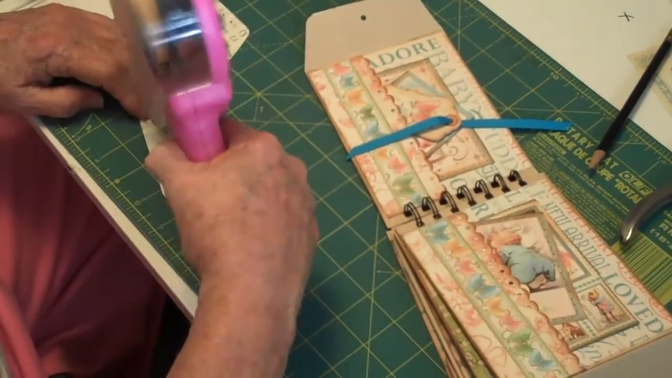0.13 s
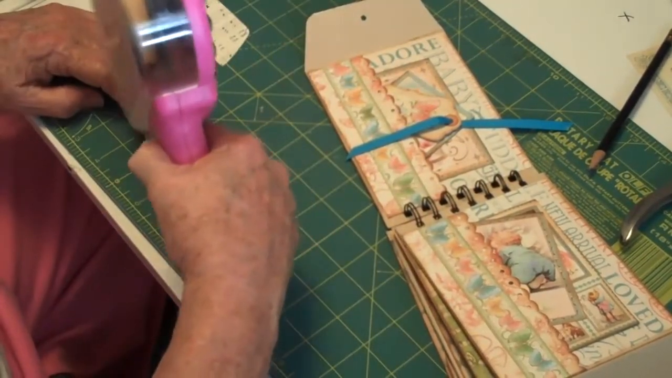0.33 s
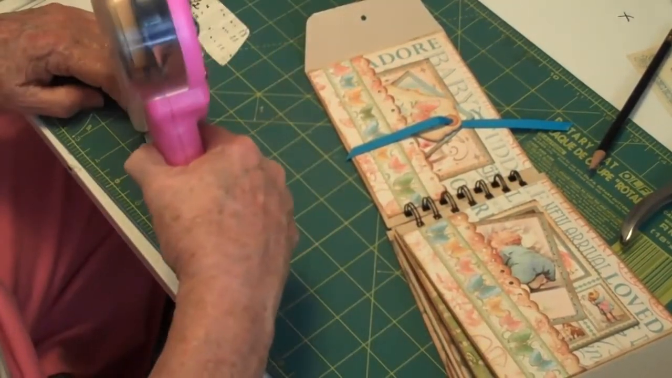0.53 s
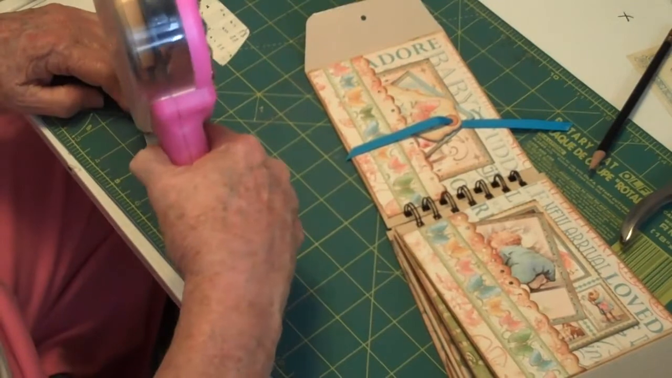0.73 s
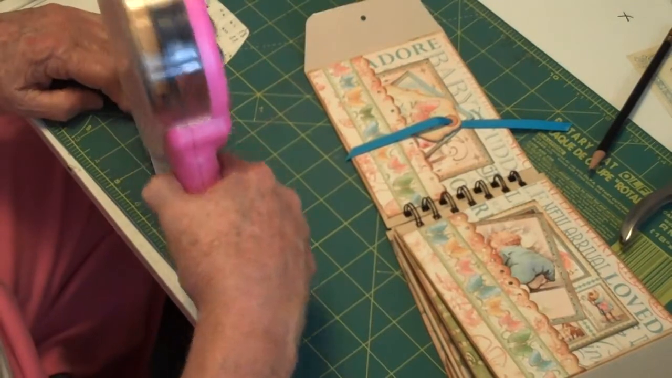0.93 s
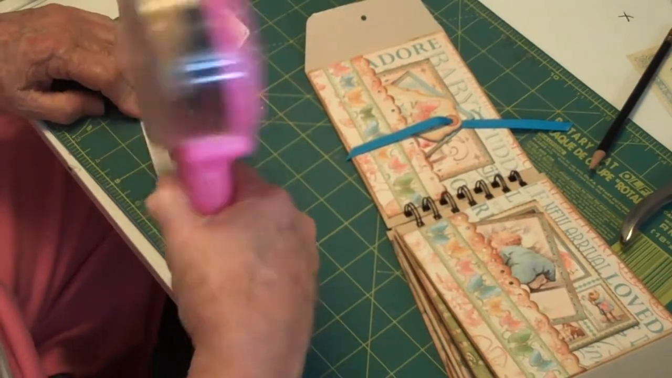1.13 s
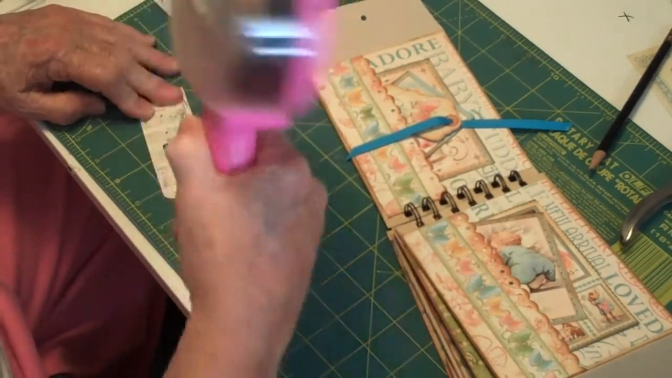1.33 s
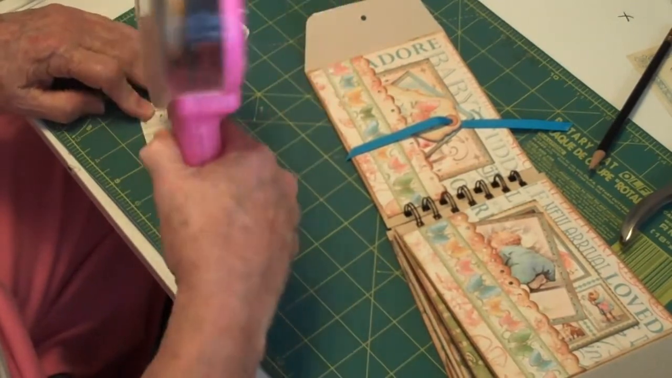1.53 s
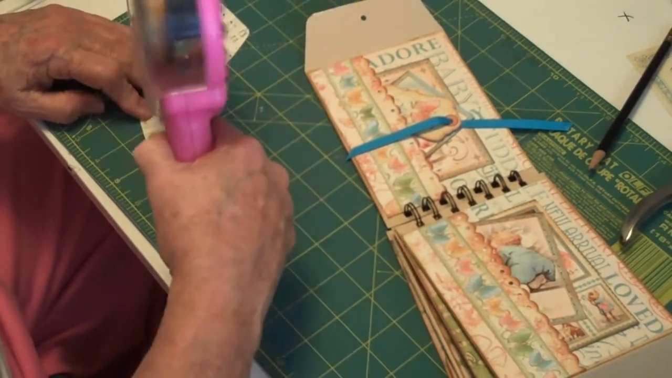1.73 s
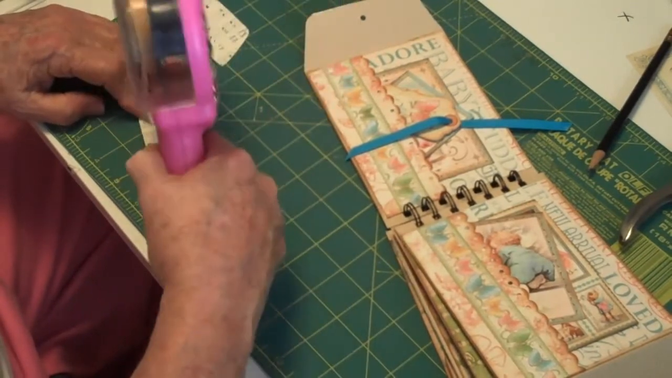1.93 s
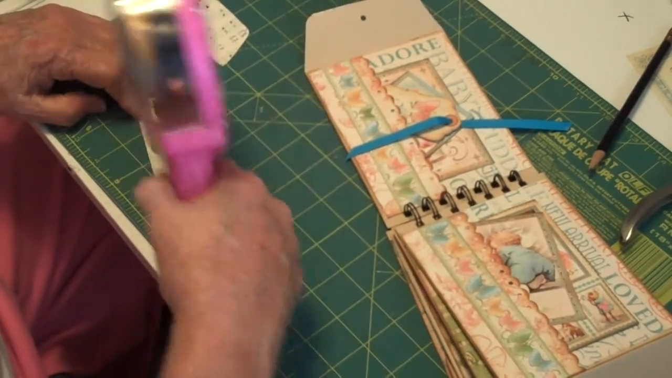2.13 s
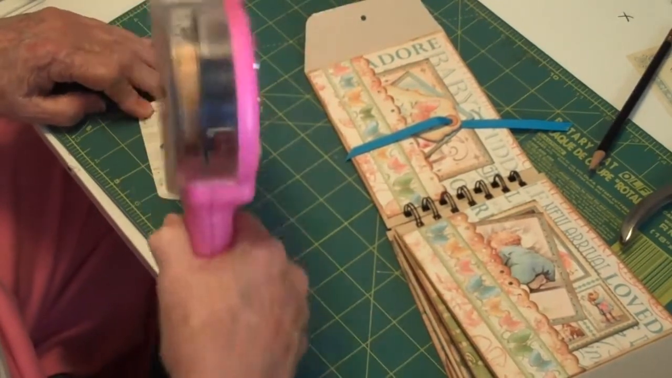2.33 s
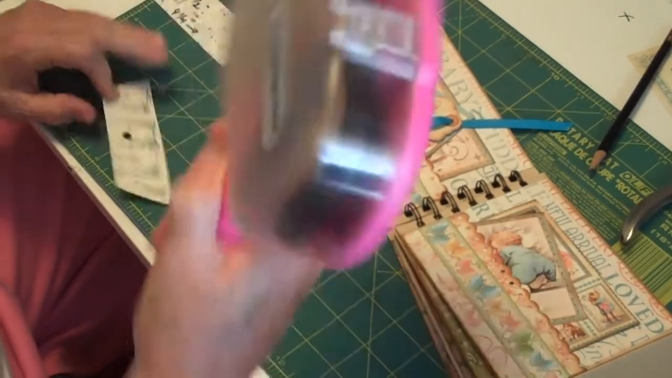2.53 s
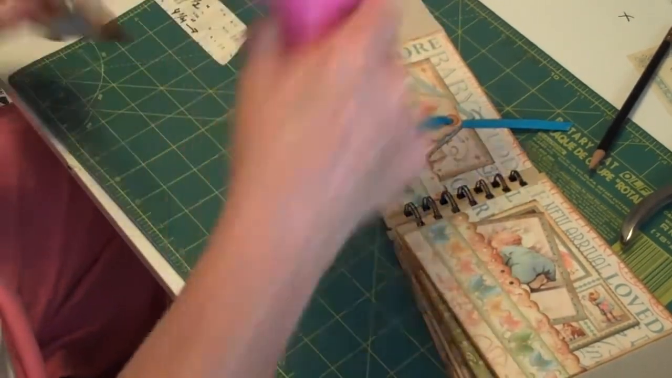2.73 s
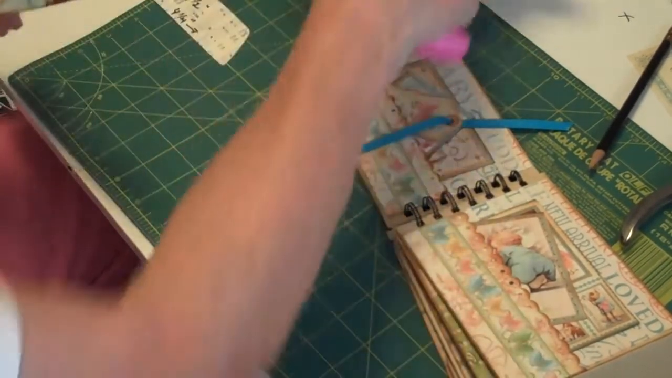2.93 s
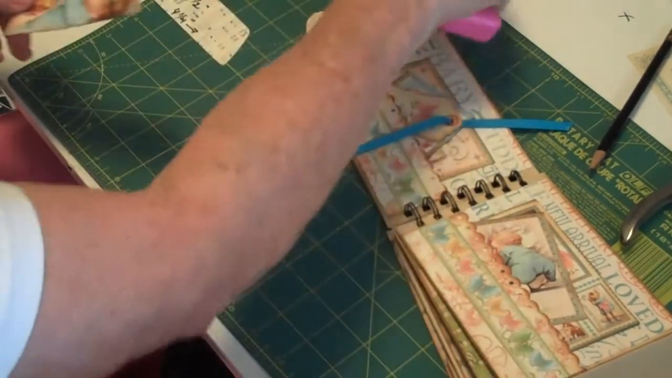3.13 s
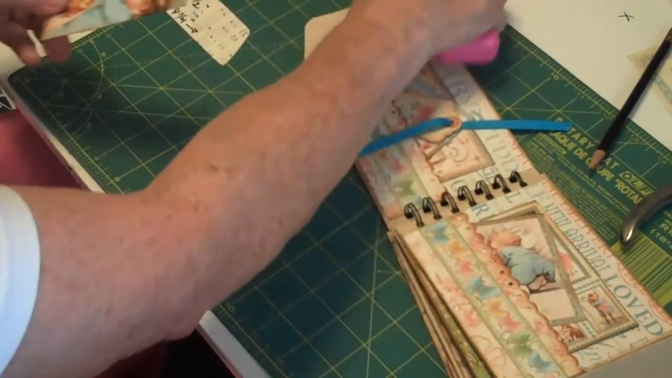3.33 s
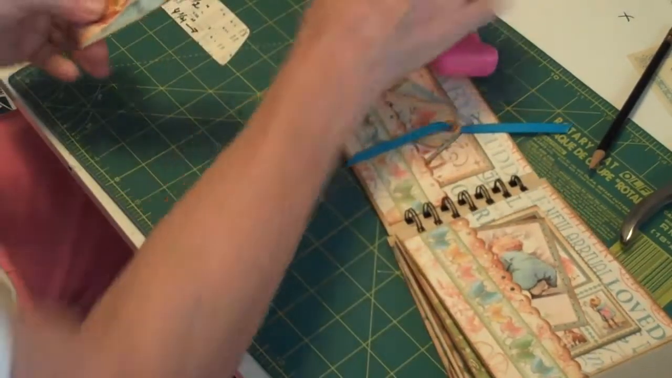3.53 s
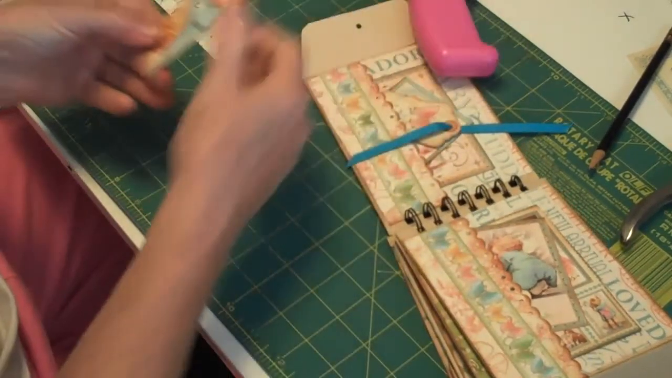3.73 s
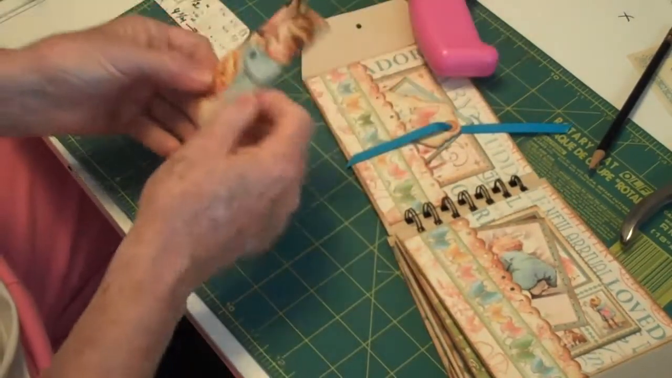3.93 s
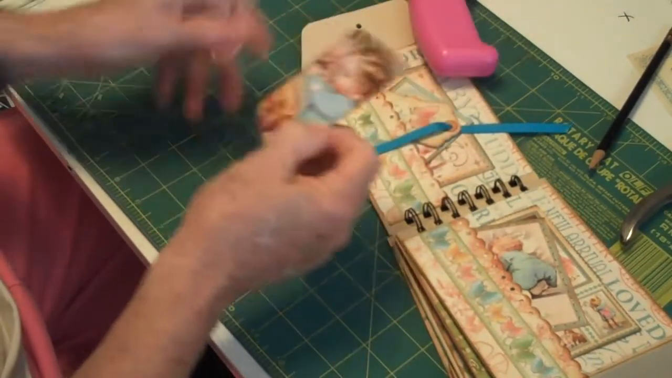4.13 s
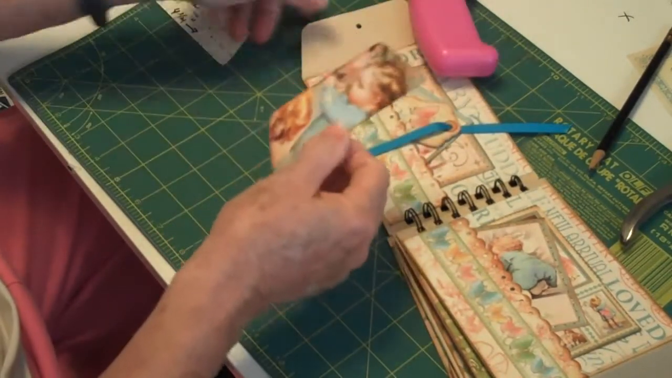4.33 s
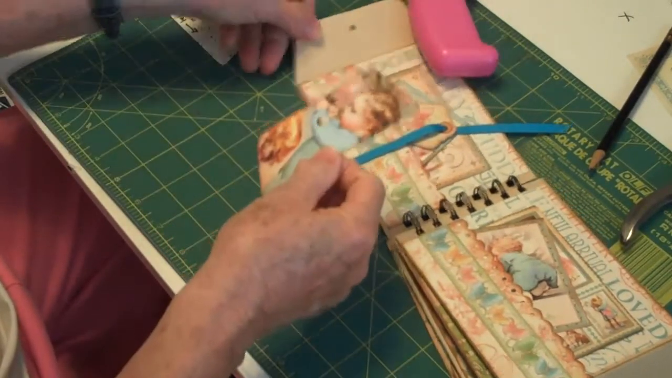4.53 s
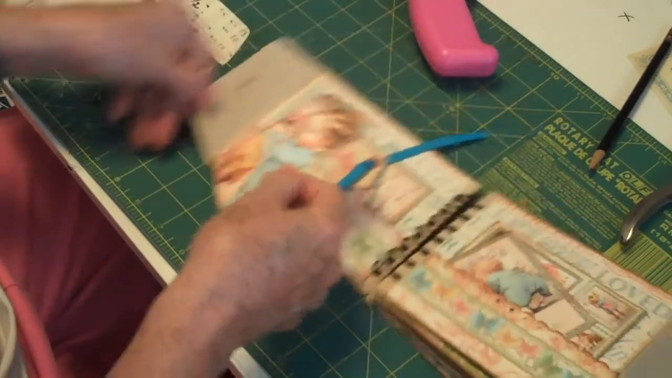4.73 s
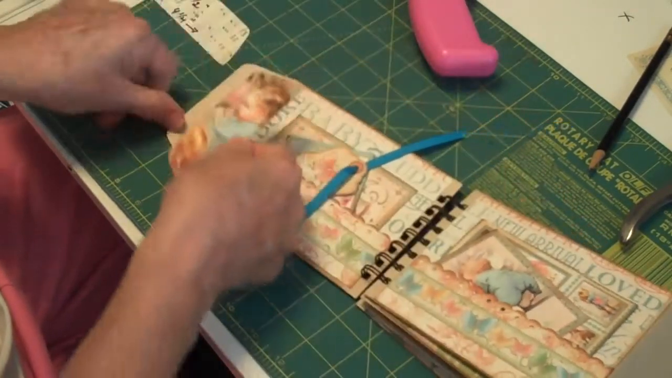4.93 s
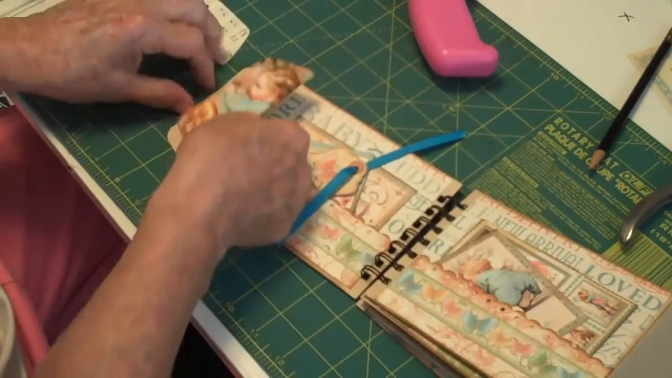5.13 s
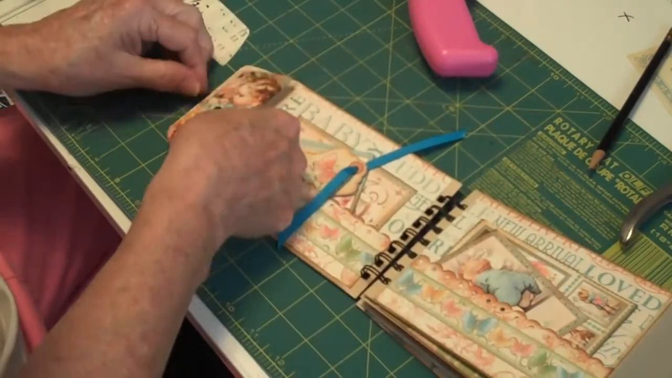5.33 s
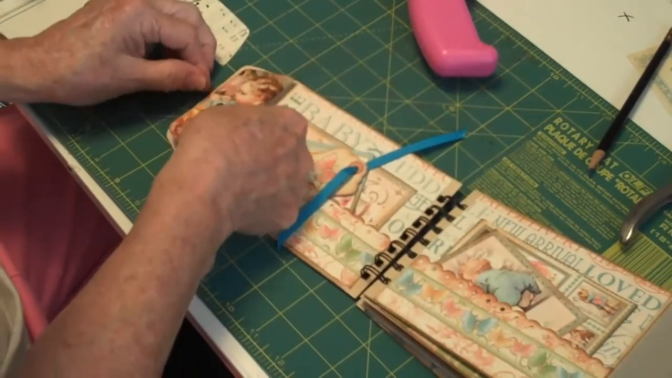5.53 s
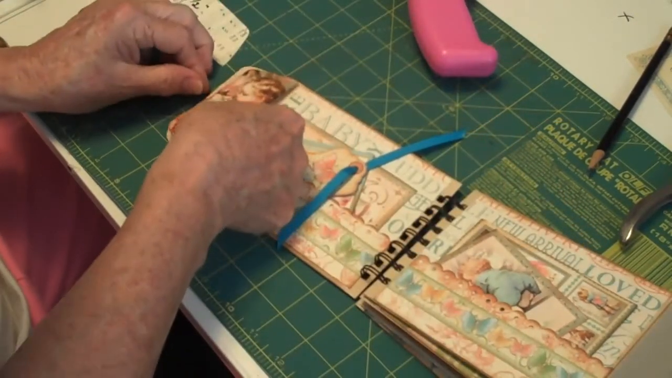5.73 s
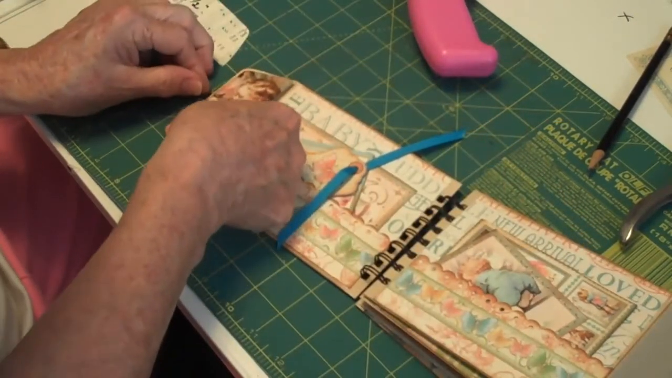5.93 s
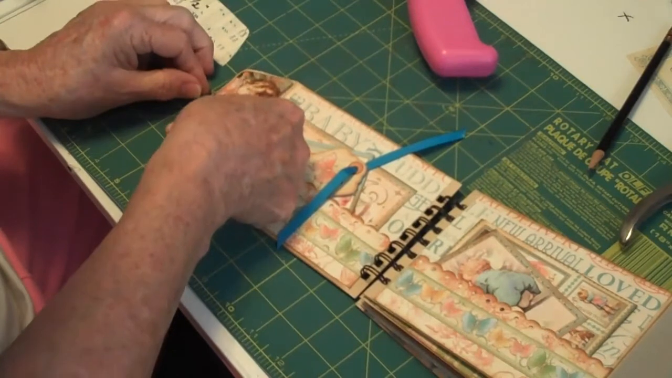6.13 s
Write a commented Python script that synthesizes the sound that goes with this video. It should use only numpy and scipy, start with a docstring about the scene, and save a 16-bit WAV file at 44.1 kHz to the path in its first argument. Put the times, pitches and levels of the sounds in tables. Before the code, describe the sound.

Faint vent hiss runs throughout. Small loose plastic rattles lead to a brief swelling tape crackle with snaps, a pause with a few ticks, then a second stroke that fades. A loud cluster of plastic clacks on a cushioned table dominates the middle. Thin card then clicks and brushes, a page lands softly, and skin stutters on paper before near silence. Close mono pickup in a small, short-echo room.

```python
"""Steady ventilation noise fills a small room, and a plastic tape gun ticks and rattles in the hand.
The gun is run twice over a paper tag: tiny pops of glue crackle over a rolling rumble, and the tape snaps free.
It is put down with a clatter of ringing shell modes, cracks and table thumps.
Card snaps and slides as filtered clicks, an album page lands with a dull pat, and a fingertip judders.
One microphone hears it all, with a gain control that turns down loud peaks."""
import sys
import numpy as np
from scipy import signal
from scipy.fft import rfft, irfft, next_fast_len
from scipy.io import wavfile
from scipy.ndimage import uniform_filter1d

SR = 44100
rng = np.random.default_rng(int(sys.argv[2]) if len(sys.argv) > 2 else 0)


def store_wav(level_fs):
    """Save 16-bit WAV to argv[1]."""
    pcm = np.round(np.clip(np.atleast_2d(level_fs), -1, 1) * 32767)
    wavfile.write(sys.argv[1], SR, pcm.T.astype(np.int16))


N = 273287  # length in samples
TIME = np.arange(N) / SR
HIT_TIME = TIME[:SR // 4]  # every hit lasts a quarter of a second
ATTACK = int(0.012 * SR)  # samples over which the level of a hit is set
TOP_HZ, TILT_PIVOT_HZ = 14000, 1600


def undb(db):
    """Turn decibels into a gain."""
    return 10 ** (np.asarray(db) / 20)


def unit(x):
    """Scale to an rms of 1."""
    return x / np.sqrt(np.mean(x ** 2))


def punch(x):
    """Scale a hit to an rms of 1 over its attack."""
    return x / np.sqrt(np.mean(x[:ATTACK] ** 2))


def band(x, lo, hi, order=3):
    """Keep only the sound between two frequencies in Hz (Butterworth band-pass)."""
    return signal.sosfilt(signal.butter(order, [lo, hi], "band", fs=SR, output="sos"), x)


def resonate(x, hz, width):
    """One resonance with its width in Hz, gain 1 at its centre."""
    return signal.lfilter(*signal.iirpeak(hz, hz / width, fs=SR), x)


def colour(x, points):
    """Filter x along a curve of (Hz, dB) points, then scale to an rms of 1."""
    hz, db = np.transpose(points)
    padded = 2 * next_fast_len(N // 2 + 1)
    freq = np.maximum(np.fft.rfftfreq(padded, 1 / SR), 1)
    gain = undb(np.interp(np.log(freq), np.log(hz), db))
    return unit(irfft(rfft(x, padded) * gain)[:N])


def envelope(moves, attack_share, release_share):
    """Gain of hand movements that swell or sag steadily; longer ones set in and let go more gently."""
    gain = np.zeros(N)
    for start, length, db, swell_db_per_s in moves:
        progress = (TIME - start) / length  # 0 at the start, 1 at the end
        held = np.interp(progress, [-attack_share, 0, 1, 1 + release_share], [0, 1, 1, 0])
        gain += held * undb(db + swell_db_per_s * length * np.clip(progress, 0, 1))
    return gain


def waver(count):
    """Smooth random curve of rms 1 that changes about count times a second."""
    window = SR // count
    smooth = uniform_filter1d(rng.standard_normal(N), window)
    return unit(uniform_filter1d(smooth, window))


def grains(rate, spread_db):
    """Random tiny clicks, about rate of them a second, most of them faint and a few strong."""
    sizes = undb(spread_db * np.minimum(rng.exponential(size=N), 5))
    happens = rng.random(N) < rate / SR
    return happens * sizes * rng.standard_normal(N)


def fade(t60):
    """Exponential decay that drops by 60 dB in t60 seconds."""
    return np.exp(-np.log(1000) * HIT_TIME / t60)


def burst(t60):
    """Decaying noise."""
    return rng.standard_normal(len(HIT_TIME)) * fade(t60)


def reflect(x, room_db=-3, room_t60=0.28):
    """Direct sound plus the short wash of the room, which gives back little bass and little top."""
    tail = band(burst(room_t60), 270, 10900, order=2)
    tail = tail / np.linalg.norm(tail)
    return x + undb(room_db) * signal.fftconvolve(x, tail)[:len(x)]


def add(out, start, hit):
    """Mix in a hit at its time in seconds."""
    i = int(start * SR)
    out[i:i + len(hit)] += hit[:N - i]


# edges of the tone bands of a hit, from low to high, in Hz
BANDS = [310, 900, 2800, 6500, 14000]


def balance(hit, levels_db):
    """Split a hit into the tone bands and set the attack of each to its level."""
    edges = zip(levels_db, BANDS, BANDS[1:])
    return sum(undb(db) * punch(band(hit, lo, hi)) for db, lo, hi in edges)


def tilted(bands_db, strength_db, tilt_db):
    """Levels of a hit in the tone bands; a positive tilt lifts the treble and lowers the bass."""
    centres = np.sqrt(np.multiply(BANDS[:-1], BANDS[1:]))
    return strength_db + np.array(bands_db) + tilt_db * np.log2(centres / TILT_PIVOT_HZ)


# Overall tone of the room noise. Each row: frequency in Hz, relative level in dB per Hz.
AIR_COLOUR = [(20, 6.5), (40, -14), (80, -10), (170, -14), (240, -7.5), (285, -17), (350, -15), (600, -4.5),
              (950, -7), (1800, -7), (2800, -10.5), (4500, -17.5), (8000, -22.5), (14000, -26.5)]
# Resonances of the vent. Each row: frequency in Hz, width in Hz, level in dB before vent_db.
VENT = [(345.4, 49, -75), (404.4, 22.5, -76.5), (548, 8.6, -73), (679.3, 28, -74), (845, 21, -110),
        (1122, 92, -69), (1344, 50, -74), (1850, 160, -70.5), (2390, 45, -84)]


def air(hiss_db=-61.5, vent_db=-1):
    """Steady room noise, plus noise sent twice through each narrow resonance of a vent."""
    hiss = undb(hiss_db) * colour(rng.standard_normal(N), AIR_COLOUR)
    vent = np.zeros(N)
    for hz, width, db in VENT:
        wide = 1.34 * width  # two passes narrow a resonance, so each is made wider
        once = resonate(rng.standard_normal(N), hz, wide)
        vent += undb(db) * unit(resonate(once, hz, wide))
    return hiss + undb(vent_db) * vent


# Ticks and rattles of the gun in the hand.
# Each row: start in seconds, strength in dB, treble tilt in dB per octave.
TICKS = [(0.021, -52.5, -0.7), (0.0606, -52.3, -1.8), (0.146, -52.5, -1.5), (0.1877, -56, -1.5),
         (0.505, -43.5, -0.2), (0.94, -55.5, -2), (1.298, -49.5, -1.8), (1.4717, -54, -1.5),
         (1.9001, -43.5, 0.7), (1.911, -43.5, -2), (1.9986, -54, -2.8), (2.058, -57, -1.5),
         (2.098, -50.5, -2.5), (2.1497, -52, -2.3), (2.183, -57, 3), (2.807, -53.5, 2.8), (3.0324, -54, 2),
         (3.0572, -55, 0.3), (3.148, -54, 0.8), (3.167, -57.5, 2), (3.199, -53, -0.8)]
# Knocks as the gun is put down. Each row: start in seconds, place struck (0 nose to 1 flank),
# strength in dB, treble tilt in dB per octave, level of the table thump in dB.
KNOCKS = [(3.068, 1, -53.5, 1.7, -74), (3.2216, 0.094, -24, -1.1, -56), (3.2278, 0.02, -28.5, 4, -52),
          (3.232, 0.1, -32, -6, -65), (3.3035, 0.35, -28, -1.7, -56), (3.401, 0.9, -45, 5, -92),
          (3.4104, 1, -37.5, -1, -62), (3.4531, 1, -18.5, 2.04, -51), (3.5639, 0.9, -41.5, -3.3, -47.5),
          (3.57, 0, -42.5, 3, -52), (3.603, 0.67, -52.5, -1, -64)]
# Tone of a tick, of a knock on the nose and of one on the flank.
# Each lists the untilted level in every tone band, in dB relative to the strength.
TICK_BANDS_DB = [-6, -0.5, -12, -17.5]
NOSE_BANDS_DB = [-10.5, -0.5, -9, -17.5]
FLANK_BANDS_DB = [-1.5, 1, -8.5, -16.5]


def blows(held_t60, ring_t60, tick_place=0.11, tick_thump_db=-21.5):
    """All that strikes the shell: start, place, thump level, ring time, levels in the tone bands."""
    rows = []
    for start, db, tilt in TICKS:
        levels_db = tilted(TICK_BANDS_DB, db, tilt)
        rows.append((start, tick_place, db + tick_thump_db, held_t60, levels_db))
    for start, place, db, tilt, thump_db in KNOCKS:
        bands_db = (1 - place) * np.array(NOSE_BANDS_DB) + place * np.array(FLANK_BANDS_DB)
        rows.append((start, place, thump_db, ring_t60, tilted(bands_db, db, tilt)))
    return rows


# Tones at which the plastic shell rings.
# Each row: frequency in Hz, relative level in dB struck on the nose, the same struck on the flank.
HOUSING = [(355, -11, -8), (511, -4, -4), (598, -11, -2), (786, -3, -9), (910, -8, -10), (1023, -3, -6),
           (1206, -1, -16), (1260, -2, -5), (1437, 0, -5), (1620, -7, 0), (1798, -5, -3), (2035, -12, -3),
           (2094, -11, -6), (2207, -7, -3), (2396, -13, -3), (2498, -15, -4), (2885, -16, -12),
           (2945, -15, -15), (3187, -20, -8), (3332, -16, -11), (3838, -14, -18), (4016, -17, -12),
           (4694, -16, -18), (4980, -17, -16), (5475, -16, -17), (5620, -22, -15), (5825, -13, -24),
           (5992, -17, -17)]
# Low tones of the table top. Each row: frequency in Hz, relative level in dB.
TABLE = [(68, -33), (118, -7), (168, -5), (205, 3), (236, 5)]


def housing(ring_t60=0.088, held_t60=0.062, blow_db=-1, blow_t60=0.0047, detune=0.02,
            crack_t60=0.029, crack_db=-1, room_t60=0.24, room_db=-11, room_hz=1300, room_width=1500,
            hiss_db=-12, thump_t60=0.13):
    """Each blow cracks, rings the hollow plastic shell and thumps the table; the room carries it on."""
    out = np.zeros(N)
    # every tone is a close cluster of three that shifts with the grip and the loose parts inside
    hz, nose_db, flank_db = np.repeat(HOUSING, repeats=3, axis=0).T
    table_tones = sum(undb(db) * np.sin(2 * np.pi * f * HIT_TIME) for f, db in TABLE)
    thump = punch(table_tones * fade(thump_t60))
    contact = 1 - fade(0.003)  # the soft mat spreads the blow over a moment
    for start, place, thump_db, t60, levels_db in blows(held_t60, ring_t60):
        sizes = undb((1 - place) * nose_db + place * flank_db)
        shifted = hz * (1 + detune * rng.standard_normal(len(hz)))
        phases = 2 * np.pi * rng.random((len(hz), 1))
        tones = sizes @ np.sin(2 * np.pi * shifted[:, None] * HIT_TIME + phases)
        # a forced first swing, then ringing; ticks ring shorter because the hand damps them
        decay = fade(t60) + undb(blow_db) * fade(blow_t60)
        ring = punch(decay * tones)

        crack = burst(crack_t60)
        rim = 1.2 * resonate(crack, 9100, 1300)  # the hard rim adds a bright tick
        crack = punch(band(crack, 990, 15000, order=2) + rim)

        # the room gives back mostly the midrange, with a thin hiss above it
        wash = resonate(burst(room_t60), room_hz, room_width) + undb(hiss_db) * burst(room_t60)
        room = punch(band(wash, 260, 18000, order=2))

        hit = contact * (ring + undb(crack_db) * crack + undb(room_db) * room)
        add(out, start, balance(hit, levels_db) + undb(thump_db) * thump)
    return out


# Strokes of the gun, with tape peeling off the reel. Each row: start in seconds, length in seconds,
# level in dB before the levels of crackle and rumble, swell in dB per second.
STROKES = [(0.98, 0.27, -65.5, 33), (2.16, 0.3, -58.5, -22)]
# Tone of the peeling crackle. Each row: frequency in Hz, relative level in dB per Hz.
PEEL_COLOUR = [(900, -31), (2000, 12), (3200, 6.5), (5000, 8), (8000, 3), (11000, 8), (14000, -2)]


def tape(crackle_db=-1, rumble_db=2, uneven_db=1.8, slowing_db_per_s=-25):
    """Glue lets go in tiny pops while the roller rumbles in the housing, less as the stroke slows."""
    crackle = colour(reflect(grains(1600, 4.2)), PEEL_COLOUR)
    bumps = grains(900, 0.6)
    rumble = resonate(bumps, 673, 140) + 0.52 * resonate(bumps, 1140, 250)
    rumble = unit(band(rumble, 370, 1250, order=2))
    rolls = [(start, length, db, swell + slowing_db_per_s) for start, length, db, swell in STROKES]
    pull = envelope(STROKES, attack_share=0.1, release_share=0.055)
    roll = envelope(rolls, attack_share=0.1, release_share=0.055)
    both = undb(crackle_db) * crackle * pull + undb(rumble_db) * rumble * roll
    return both * undb(uneven_db * waver(count=25))


# Snaps of tape and card. Each row: time of the peak in seconds, rise in seconds, ring in Hz,
# ring level in dB relative to the crack, strength in dB, treble tilt in dB per octave.
SNAPS = [(1.16, 0.0023, 2770, -15, -54, -3), (1.2066, 0.00047, 2480, -7, -39, 0.5),
         (1.2118, 0.0011, 3220, -8, -43, 0), (1.221, 0.0038, 4400, -8, -48.5, 0.5),
         (1.2273, 0.00051, 7150, 14, -47.5, 4), (1.2637, 0.0022, 1660, 2, -42.5, -2.5),
         (1.895, 0.0029, 1404, -20, -54, -1.5), (2.4715, 0.003, 1580, -17, -45.5, 2),
         (2.5952, 0.00039, 8400, -8, -71.5, 10), (2.6022, 0.0027, 7260, 5, -69.5, 9.5),
         (2.982, 0.0025, 1730, -1, -45, -0.9), (4.126, 0.0026, 10150, -5, -60.5, 3),
         (4.152, 0.00095, 2660, 0, -42.5, -1.2), (4.157, 0.00081, 4960, -5, -40, -0.7),
         (4.2725, 0.00061, 1660, -11, -66, 0), (4.727, 0.0025, 1200, -3, -51.5, -5),
         (4.77, 0.0053, 1110, -17, -47, -0.6), (4.887, 0.0023, 2680, -16, -57.5, -5),
         (4.938, 0.0036, 4830, -14, -53.5, -2), (5.2124, 0.00027, 3400, -1, -51, -2),
         (5.4078, 0.0004, 1920, -9, -53, -2)]
# Untilted level of a snap in every tone band, in dB relative to its strength.
SNAP_BANDS_DB = [-14.5, -1, -0.5, -3]


def snaps(ring_q=6, room_db=-3, room_t60=0.11):
    """Tape tears free or a card edge flicks: a brief swell of noise with one broad ring, then the room."""
    out = np.zeros(N)
    for peak, rise, hz, ring_db, strength_db, tilt_db in SNAPS:
        swell = (HIT_TIME / rise * np.exp(-HIT_TIME / rise)) ** 2
        crack = rng.standard_normal(len(HIT_TIME)) * swell
        ring = punch(resonate(crack, hz, hz / ring_q))
        hit = punch(crack) + undb(ring_db) * ring
        hit = band(hit, 430, 14000)  # a light sheet gives off little bass
        hit = reflect(hit, room_db, room_t60)
        add(out, peak - rise, balance(hit, tilted(SNAP_BANDS_DB, strength_db, tilt_db)))
    return out


# Card sliding over card. Each row: start in seconds, length in seconds, level in dB before the
# levels of hiss and body, swell in dB per second, extra level of the sheet's body in dB.
SLIDES = [(1.508, 0.01, -62.5, 0, -10), (2.569, 0.049, -55, -20, -10), (2.82, 0.046, -60, 120, -6),
          (4.493, 0.012, -60, 0, -2.5), (4.538, 0.034, -65.5, 0, 0), (4.672, 0.077, -51, -44, -2.5),
          (4.805, 0.097, -59, -1, 2.5), (4.992, 0.16, -60, 13, -3.5), (5.152, 0.01, -57, 0, -13),
          (5.35, 0.077, -60, -45, 0.5)]
# Resonances of the sliding card. Each row: frequency in Hz, width in Hz.
SHEET = [(2750, 2400), (3900, 960), (5050, 560), (7400, 2400)]
# Tone of the sliding hiss. Each row: frequency in Hz, relative level in dB per Hz.
SLIDE_COLOUR = [(1500, -24), (2800, -4.5), (5000, -2), (7000, -6.5), (10500, 1), (12500, -7), (14000, -3.5)]


def card(hiss_db=-1, body_db=-2, catch_db=-3, flex_db=5, sheet_db=-8, uneven_db=2.94,
         attack_share=0.59, release_share=0.46):
    """Paper fibres slip densely and now and then catch; the sheet's resonances come and go as it bends."""
    catches = unit(grains(260, 1.5))
    slips = reflect(unit(grains(7000, 0.53)) + undb(catch_db) * catches)
    sheet = sum(undb(flex_db * waver(count=12)) * resonate(slips, hz, width) for hz, width in SHEET)
    sheet = unit(band(sheet, 3000, 11500))
    hiss = unit(colour(slips, SLIDE_COLOUR) + undb(sheet_db) * sheet)
    body = unit(band(slips, 960, 4300, order=2))
    out = np.zeros(N)
    for *move, bend_db in SLIDES:
        rub = undb(hiss_db) * hiss + undb(body_db + bend_db) * body
        out += rub * envelope([move], attack_share, release_share)
    pressure = undb(uneven_db * waver(count=40))
    return pressure * out


# Low resonances of the album page on the mat. Each row: frequency in Hz, width in Hz, relative level in dB.
PAGE = [(190, 90, -10), (550, 78, 2), (785, 140, -8)]


def page(start=4.767, level_db=-52, push_t60=0.086):
    """The stiff page falls open and lands with a soft, dull pat: softened noise through low resonances."""
    push = burst(push_t60) * (1 - fade(0.017))
    pat = sum(undb(db) * punch(resonate(push, hz, width)) for hz, width, db in PAGE)
    out = np.zeros(N)
    add(out, start, undb(level_db) * punch(band(pat, 120, 1300, order=2)))
    return out


# A fingertip judders over the picture.
# Each row: start in seconds, length in seconds, level in dB, swell in dB per second.
RUBS = [(5.353, 0.03, -48, 0), (5.41, 0.04, -53, -110)]


def finger():
    """Skin sticks and slips on card in tiny clicks, ringing the page."""
    slips = reflect(grains(870, 1.6))
    main_ring = resonate(resonate(slips, 1800, 450), 1810, 450)
    ring = main_ring + 0.58 * resonate(slips, 1360, 460)
    return unit(ring) * envelope(RUBS, attack_share=0.18, release_share=0.59)


def scene():
    """Everything reaches one microphone, the same in both channels."""
    mono = air() + housing() + tape() + snaps() + card() + page() + finger()
    return np.array([mono, mono])


def record(dry, threshold_db=-13, squeeze=0.31, recovery_db_per_s=5):
    """The microphone dulls the top; loud peaks turn the gain down at once and it recovers steadily."""
    heard = signal.sosfilt(signal.butter(4, 11800, fs=SR, output="sos"), dry)
    level_db = 20 * np.log10(np.abs(heard[0]) + 1e-9)
    over_db = squeeze * np.maximum(level_db - threshold_db, 0)
    # hold the largest cut so far, less what has been recovered since
    recovered_db = recovery_db_per_s * TIME
    duck_db = np.maximum.accumulate(over_db + recovered_db) - recovered_db
    top_cut = signal.ellip(10, 0.2, 70, TOP_HZ, fs=SR, output="sos")
    return signal.sosfilt(top_cut, heard * undb(-duck_db))


dry = scene()
out = record(dry)
store_wav(out)
```